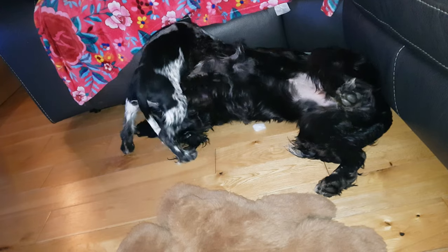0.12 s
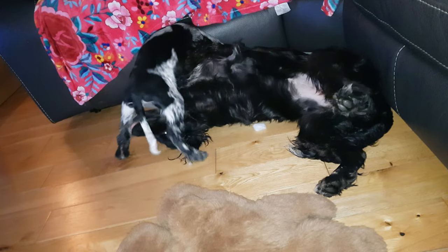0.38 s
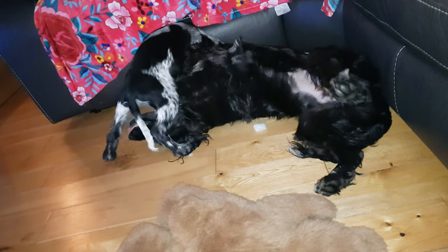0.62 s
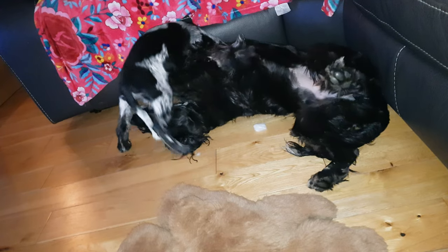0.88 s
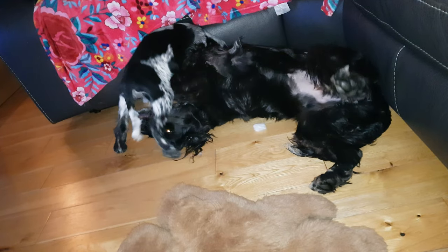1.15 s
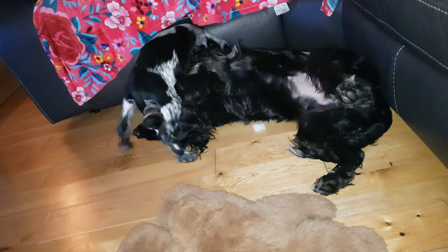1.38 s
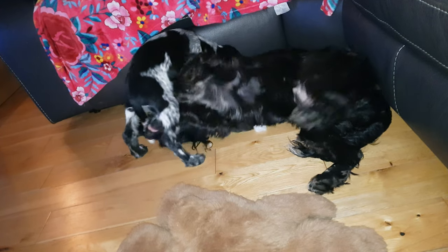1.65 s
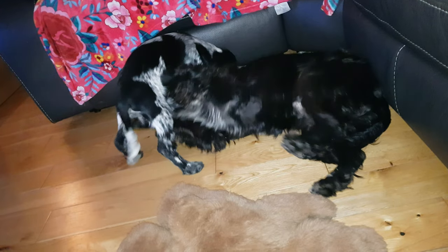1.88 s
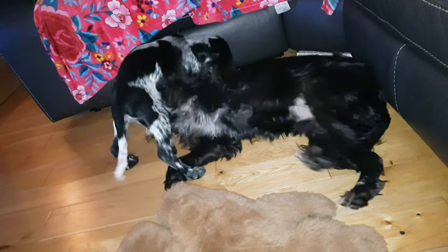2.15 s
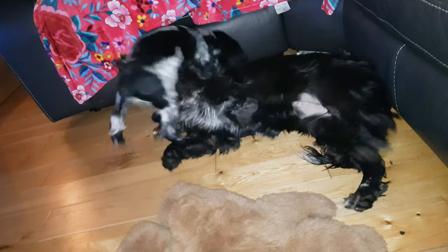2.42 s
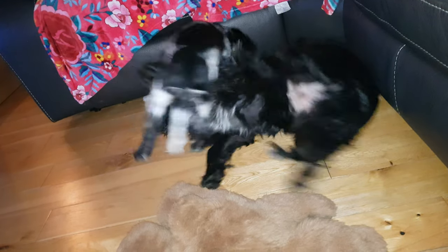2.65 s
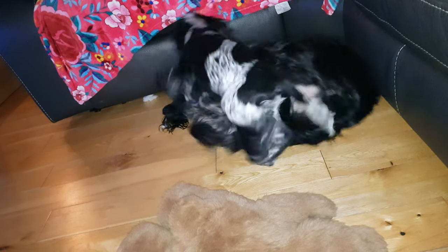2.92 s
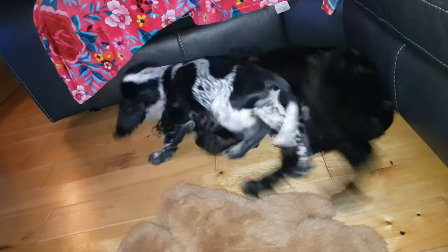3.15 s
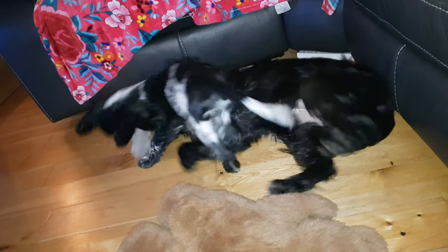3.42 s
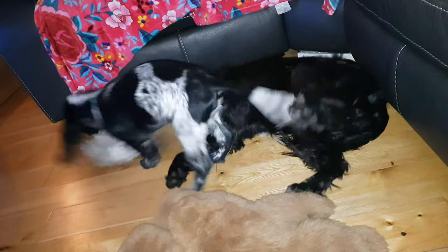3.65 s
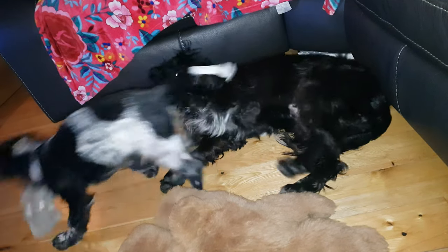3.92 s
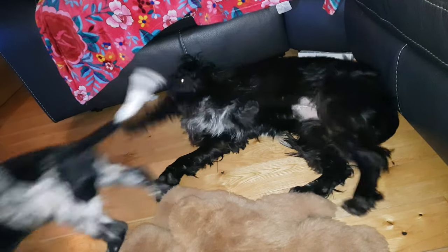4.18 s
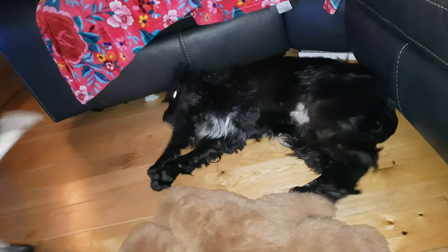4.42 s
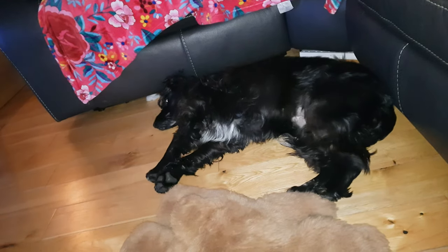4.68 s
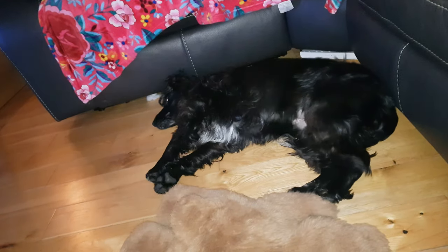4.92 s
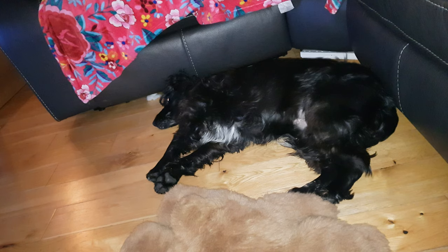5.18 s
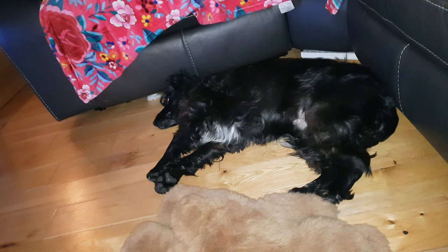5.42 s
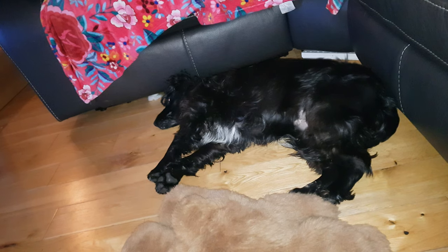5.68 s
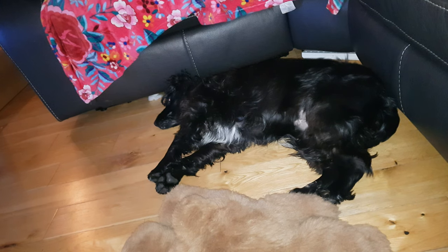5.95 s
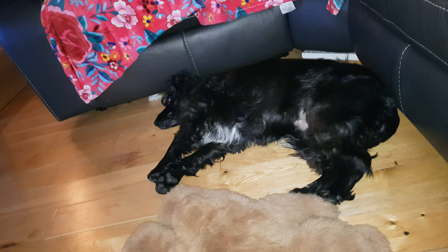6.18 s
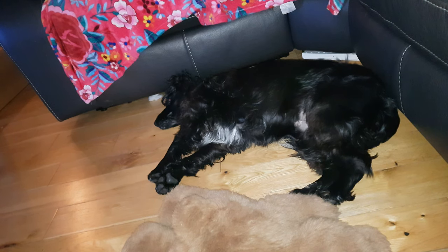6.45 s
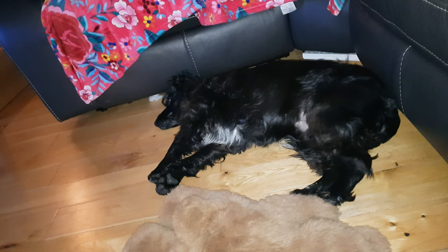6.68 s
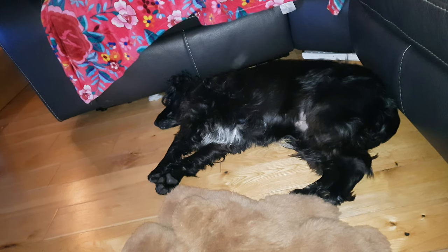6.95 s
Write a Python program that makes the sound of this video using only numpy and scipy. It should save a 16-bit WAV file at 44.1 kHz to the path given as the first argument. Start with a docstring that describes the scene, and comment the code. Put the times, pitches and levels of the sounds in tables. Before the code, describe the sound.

A quiet living room with a very faint wavering low motor hum and soft air noise, picked up closely in stereo with a short, damped echo. From 0 to 1.4 seconds there are breathy puffs and silky, high fur swishes mostly on the right, with a faint thud at 0.2 and a tiny claw skid near 0.6. Dull, hollow floor thumps come at 1.5 and 2.15, with brief board rattles. At 2.9 a blow brings clattering claws and rattling wood; more knocks follow, climaxing at 3.2 in a heavy, booming thud with a hard crack. From 3.4 to 4.4 lighter thumps, swishes, pants and skids trail off as a dog scampers away. Soft low bumps follow at 4.6 and 4.75, with a little crinkle. Between about 5.4 and 6.4, crisp crackling bursts with sharp snaps are strongest around 5.55 and 5.8, then near silence to 7.

```python
"""Dogs wrestling on a wooden floor

Two dogs wrestle on a sprung floor in a quiet living room. Blows set floor modes ringing, loose boards
rattle in bands of noise, and claws tick and skid. Panting and brushing fur are shaped noise; later
something crinkly is clawed nearby, made of many tiny rings. A motor hums below, as two wavering tones.
"""
import sys
import numpy as np
from scipy import signal
from scipy.fft import rfft, irfft, next_fast_len
from scipy.io import wavfile

SR = 44100
rng = np.random.default_rng(int(sys.argv[2]) if len(sys.argv) > 2 else 0)


def digitize_waveform(pressure):
    """Quantize a signal to 16-bit integers and store it at the path in sys.argv[1].

    Rows of a 2-D input are taken as channels; values are limited to [-1, 1].
    """
    field = np.atleast_2d(pressure).T
    bounded = np.clip(field, -1, 1)
    quanta = np.round(bounded * 32767).astype(np.int16)
    wavfile.write(sys.argv[1], SR, quanta)


def invert_db(level):
    """Linear amplitude ratio for a level in decibels (20 dB per decade), elementwise."""
    return 10 ** (np.asarray(level, dtype=float) / 20)


N = 311787   # length in samples

# how alike left and right are at each pitch: pitch_hz, likeness (0 unrelated, 1 the same)
LIKENESS = [(60, 0.95), (250, 0.64), (600, 0.3), (1200, 0), (5000, 0)]
EDGE_DB = 20   # a swell, fade or rattle length is the time to this far under the peak


def rms_one(x):
    """Scales a sound to an average (rms) level of 1."""
    return x / np.sqrt(np.mean(x ** 2) + 1e-20)


def bins_hz():
    """Lists the pitches of a spectrum of the whole scene, with 1 Hz in place of zero."""
    return np.maximum(np.fft.rfftfreq(N, 1 / SR), 1)


def at_hz(points, hz):
    """Reads a curve between its points, on a logarithmic pitch axis."""
    points = np.array(points)
    return np.interp(np.log(hz), np.log(points[:, 0]), points[:, 1])


def drift(rate_hz):
    """Makes a slow random wander of rms 1: smoothed noise, worked out every 40 samples."""
    r = np.exp(-80 * np.pi * rate_hz / SR)
    steps = rng.standard_normal(N // 40 + 2002)
    slow = signal.lfilter([1], [1, -2 * r, r * r], steps)[2000:]   # skip the settling in
    return np.interp(np.arange(N) / 40, np.arange(len(slow)), rms_one(slow))


def panned(x, lean_db):
    """Turns the left up by half the lean and the right down by half."""
    return x * invert_db(np.array([[0.5], [-0.5]]) * lean_db)


def colour(x, spectrum):
    """Filters a sound by a curve of pitch_hz, level_db and scales it to rms 1."""
    return rms_one(irfft(rfft(x) * invert_db(at_hz(spectrum, bins_hz())), N))


def wide_noise():
    """Makes stereo noise, alike on both sides in the bass and unrelated in the treble."""
    alike = np.clip(at_hz(LIKENESS, bins_hz()), 0, 1)
    mid, side = rfft(rng.standard_normal((2, N)))
    return irfft(np.sqrt(1 + alike) * mid + np.sqrt(1 - alike) * side * [[1], [-1]], N)


def ring(clicks, hz, t60_s):
    """Lets each unit click start a dying sine of height 1 (t60: time to fall by 60 dB)."""
    r = invert_db(-60 / (t60_s * SR))
    w = 2 * np.pi * hz / SR
    return signal.lfilter([0, np.sin(w)], [1, -2 * r * np.cos(w), r * r], clicks + 1e-18)


def strokes(rows, peaks, bend, climb_per_s=0):
    """Adds up swells and fades (bend 1 pointed, higher flatter), each times a peak that may climb."""
    peak_s, swell_s, fade_s = np.transpose(rows)[:3, :, None]
    late_s = np.arange(0, N + 40, 40) / SR - peak_s
    away = np.where(late_s < 0, -late_s / np.abs(swell_s), late_s / np.abs(fade_s))
    shape = invert_db(-np.minimum(EDGE_DB * away ** bend, 90)) ** 2
    climb = 1 + climb_per_s * np.clip(late_s, -swell_s, fade_s)
    total = peaks @ (shape * climb)
    return np.interp(np.arange(N) / 40, np.arange(len(total)), total)


def stroke_gain(rows, column, bend):
    """Gives the loudness curve of strokes whose peak levels in dB stand in one column."""
    power = invert_db(np.array(rows)[:, column]) ** 2
    return np.sqrt(strokes(rows, power, bend))


def stroke_pitch(rows, bend, climb_per_s):
    """Gives the loudness curve and a pitch in Hz that leans to the loudest stroke and climbs."""
    power, hz = invert_db(np.array(rows)[:, 3]) ** 2, np.array(rows)[:, 4]
    total = strokes(rows, power, bend)
    return np.sqrt(total), strokes(rows, power * hz, bend, climb_per_s) / total


def room_tone():
    """A motor hum of wavering sines, over a noise of rumble and hiss."""
    # hum tones: pitch_hz, level_db (before the waver)
    hum_tones = [(49.5, -59.5), (99, -70)]
    # colour of the air noise: pitch_hz, density_db (per Hz, before scaling)
    air_colour = [(33, -25.5), (46, -11.5), (66, -11), (152, -15), (222, -27.5), (283, -25.5), (391, -34),
                  (2030, -39), (3480, -42), (4100, -38), (4430, -32.5), (4850, -41), (7010, -36.5),
                  (8470, -43), (14500, -39.5), (15700, -41.5)]
    # left-right balance of the air noise: pitch_hz, lean_db (plus is left)
    air_lean = [(60, 5.5), (180, -2), (550, 2), (1650, -1), (4970, -5.5), (15000, 1)]
    air_db = -66
    turns = np.cumsum(1 + 0.002 * drift(0.66)) / SR   # one shared waver of pitch
    hum = 0
    for hz, db in hum_tones:
        level = np.sqrt(2) * invert_db(db + hz / 50 * drift(4.0))
        hum = hum + level * np.sin(2 * np.pi * hz * turns)
    air = colour(wide_noise(), air_colour)
    air = irfft(panned(rfft(air), at_hz(air_lean, bins_hz())), N)
    return hum + invert_db(air_db + 0.53 * drift(8.9)) * air


def living_room(x):
    """Echoes from eight feedback delays a side, duller on every round."""
    t60_s, wall_cut_hz = 0.3, 10400
    size = next_fast_len(N + SR)   # room for the tail
    w = 2 * np.pi * np.fft.rfftfreq(size)
    dull = np.exp(-2 * np.pi * wall_cut_hz / SR)
    wall = (1 - dull) / (1 - dull * np.exp(-1j * w))
    echoes = np.zeros((2, len(w)), complex)
    lags = (rng.uniform(0.01, 0.023, 16) * SR).astype(int)
    for k, lag in enumerate(lags):
        loop = invert_db(-60 * lag / SR / t60_s) * wall * np.exp(-1j * w * lag)
        echoes[k % 2] += loop / (1 - loop) * (-1) ** (k // 2)
    # long waves reach both microphones alike
    alike = np.clip(at_hz(LIKENESS, np.maximum(w * SR / (2 * np.pi), 1)), 0, 1)
    echoes[1] = alike * echoes[0] + np.sqrt(1 - alike ** 2) * echoes[1]
    wet = irfft(echoes * rfft(x, size), size)[:, :N]
    # the echo carries little of the deep bass
    return signal.lfilter(*signal.butter(2, 170, "high", fs=SR), wet)


def crinkling(per_s=3000, size_db=5.5, bend=0.78, cycles=9.1):
    """Dense uneven snaps in clumps, each a brief ring, over a rubbing hiss; some strokes add a dull part."""
    # strokes: peak_s, swell_s, fade_s, bright_db, dull_db (levels before panning)
    crinkle_strokes = [(4.76, 0.019, 0.13, -61.5, -82.5), (5.49, 0.03, 0.072, -60.5, -113),
                       (5.55, 0.051, 0.098, -52, -60.5), (5.62, 0.18, 0.44, -64.5, -86),
                       (5.81, 0.08, 0.073, -49, -55.5), (5.86, 0.039, 0.13, -50, -72),
                       (6.07, 0.025, 0.15, -55.5, -72), (6.2, 0.26, 0.27, -57, -73),
                       (6.39, 0.062, 0.075, -57, -78.5)]
    # colour of the bright part: pitch_hz, density_db (per Hz, before scaling)
    bright_colour = [(1470, -57), (2200, -36), (2980, -0.5), (3400, -5.5), (4060, 2.5), (6350, 3.5),
                     (8120, -4), (11300, -3), (15700, -11)]
    dull_colour = [(500, -17), (1000, -6.0), (2500, 3.0), (3500, -21.0), (6000, -39.0)]   # (Hz, dB)
    dull_lag_s = 0.02   # the dull part follows the bright part
    born = rng.random(N) < per_s * invert_db(5 * drift(40)) / SR   # the rate wanders, so snaps clump
    sizes = invert_db(size_db * np.minimum(rng.exponential(1, N), 3.5))
    clicks = born * sizes * rng.choice([-1, 1], N)
    dealt = rng.integers(0, 8, N)   # each snap gets one of eight pitches
    snaps = np.zeros(N)
    for k, hz in enumerate(np.geomspace(1500, 13000, num=8)):
        snaps += ring(clicks * (dealt == k), hz, cycles / hz) * np.sqrt(hz)
    source = rms_one(snaps) + 1.84 * wide_noise()
    dull = colour(source, dull_colour)
    dull_gain = np.roll(stroke_gain(crinkle_strokes, 4, bend), int(dull_lag_s * SR))
    bright = stroke_gain(crinkle_strokes, 3, bend) * colour(source, bright_colour)
    return panned(bright + dull_gain * dull, -2.2)


def brushing(flutter_db=1.5, left_db=-22, right_db=5.0, octaves=0.15, bend=1.69):
    """Smooth bright friction noise close on the right; its brightest band climbs through each stroke."""
    # strokes: peak_s, swell_s, fade_s, strength_db (before mixing and panning), brightest_hz (at the peak)
    brush_strokes = [(0.8, .12, 0.14, -60.5, 12400), (0.97, 0.12, 0.098, -59, 12540),
                     (1.19, 0.12, 0.29, -62.5, 10700), (1.37, 0.069, 0.15, -63.5, 10700),
                     (1.62, 0.25, 0.27, -66, 12100), (2.62, 0.064, 0.13, -60, 13500),
                     (2.92, 0.036, 0.18, -55.5, 11900), (3.13, 0.36, 0.23, -62, 10000),
                     (3.62, 0.092, 0.84, -70.5, 13800), (3.89, 0.19, 0.074, -55, 12800),
                     (3.985, 0.014, 0.031, -60, 12100), (4.174, 0.11, 0.12, -59.5, 13000)]
    # colour of the hiss: pitch_hz, density_db (per Hz, before scaling)
    hiss_colour = [(3530, -33.5), (6000, -12.5), (6910, -2.5), (8700, -7.5), (11000, -0.5), (14400, -3.5),
                   (15700, -0.5)]
    gain, centre_hz = stroke_pitch(brush_strokes, bend, climb_per_s=0.37)
    hiss = colour(rng.standard_normal((2, N)), hiss_colour)
    out = 0.44 * hiss
    # fade between six fixed bands so that the bright spot can move
    for hz in np.geomspace(9500, 15000, num=6):
        band = signal.butter(1, [hz / 1.07, hz * 1.07], "band", fs=SR, output="sos")
        nearness = np.exp(-(np.log2(centre_hz / hz) / octaves) ** 2)
        out = out + nearness * signal.sosfilt(band, hiss)
    return out * invert_db(np.array([[left_db], [right_db]])) * gain * invert_db(flutter_db * drift(12))


def panting(flutter_db=1.57, bend=1.16):
    """Turbulent air through the open mouth and past the teeth; fur on wood sounds much alike."""
    # breaths and fur strokes: peak_s, swell_s, fade_s, mouth_db, teeth_db (before flutter and panning)
    breaths = [(0.4, 0.089, 0.44, -58.5, -61.5), (0.72, 0.56, 0.38, -80.5, -66),
               (1.2, 0.068, 0.17, -75.5, -68.5), (1.9, 0.86, 0.77, -73.5, -71),
               (2.55, 0.2, 0.67, -79, -72.5), (2.884, 0.016, 0.14, -67, -63.5), (3.07, 0.18, 1, -68, -66),
               (3.23, 0.095, 0.19, -58, -61), (3.41, 0.006, 0.15, -74, -64), (3.5, 0.15, 0.061, -67, -66),
               (3.78, 0.14, 0.2, -69, -63.5), (3.97, 0.29, 0.16, -71, -67.5),
               (4.215, 0.083, 0.055, -65.5, -68), (4.305, 0.03, 0.26, -63.5, -70),
               (4.8, 1, 0.071, -78.5, -71.5), (4.87, 0.11, 0.06, -71, -70.5),
               (5.057, 0.02, 0.092, -66.5, -68), (5.33, 0.16, 0.23, -80.5, -69)]
    # colour of open-mouth air: pitch_hz, density_db (per Hz, before scaling)
    mouth_colour = [(410, -16), (700, -12), (860, -8.5), (1130, -1.5), (1490, -10), (1840, -2.5),
                    (3600, -8.5), (4680, -4), (7920, -120)]
    # colour of air past the teeth: pitch_hz, density_db (per Hz, before scaling)
    teeth_colour = [(2120, -32), (3600, -6.5), (5180, 3), (7230, -0.5), (8980, -9.5), (11400, -9),
                    (15100, -17), (15700, -62)]
    mouth = colour(wide_noise(), mouth_colour) * stroke_gain(breaths, 3, bend)
    mouth = mouth * invert_db(flutter_db * drift(24))
    teeth = colour(wide_noise(), teeth_colour) * stroke_gain(breaths, 4, bend)
    teeth = teeth * invert_db(flutter_db * drift(22))
    return panned(mouth + teeth, -3.0)


def skidding(width_hz=300, bend=1.4):
    """Skidding claws: slow noise times a sine makes a narrow band of noise around the sine's pitch."""
    # skids: peak_s, swell_s, fade_s, level_db (before panning), pitch_hz (at the peak)
    skids = [(0.635, 0.03, 0.053, -61.5, 4500), (0.78, 0.25, 0.24, -73, 997.5),
             (1.43, 0.01937, 0.07, -76.5, 1790), (3.785, 0.066, 0.14, -64.5, 1866),
             (3.946, 0.1, 0.088, -66.5, 2048), (4.315, 0.025, 0.052, -64, 2600),
             (4.87, 0.067, 0.1, -74.5, 2076)]
    gain, centre_hz = stroke_pitch(skids, bend, climb_per_s=0.061)
    lowpass = signal.butter(2, width_hz, fs=SR)
    slow = rms_one(signal.lfilter(*lowpass, rng.standard_normal((2, N))))
    tone = np.sqrt(2) * np.sin(2 * np.pi * np.cumsum(centre_hz) / SR)
    return panned(gain * slow * tone, -4.5)


def ticks(cycles=16.0, grit_t60_s=0.009):
    """Claw ticks and crinkle snaps: each is a short gritty ring, filtered around its own pitch."""
    # ticks: start_s, level_db (before filtering and panning), pitch_hz
    tick_rows = [(2.875, -43.5, 4430), (2.8751, -36, 1880), (3.2215, -31, 2100), (4.301, -48, 4870),
                 (4.4028, -47, 4400), (5.555, -40, 7400), (5.777, -43, 6680), (5.814, -35, 6400),
                 (5.8248, -31.5, 5460), (5.854, -41, 3000), (6.0672, -36, 6700), (6.13, -47, 4350),
                 (6.162, -37, 10430), (6.241, -48, 5000), (6.264, -36, 6050), (6.2815, -33.5, 6800),
                 (6.331, -45.5, 6780), (6.3596, -43, 6800), (6.369, -38.5, 11630)]
    out, t = np.zeros(N), np.arange(800) / SR
    grit = rng.standard_normal((len(tick_rows), len(t)))
    for (s, db, hz), noise in zip(tick_rows, grit):
        band = signal.butter(2, [hz * 0.72, min(hz * 1.24, 14000)], "band", fs=SR, output="sos")
        tone = np.sin(2 * np.pi * hz * t) * invert_db(-60 * t * hz / cycles)   # falls 60 dB in so many cycles
        tick = tone + 0.5 * noise * invert_db(-60 * t / grit_t60_s)
        at = round(s * SR)
        out[at:at + len(t)] += invert_db(db) * signal.sosfilt(band, tick)
    return panned(out, -2.5)


def rattles(bend=1.8, rise_s=0.002):
    """A loose board rattles on after some blows: a band of noise that holds a moment and then stops."""
    # rattles: start_s, length_s, level_db (before the rise and fall), pitch_hz (middle), width_hz
    rattle_rows = [(1.511, 0.095, -74, 1050, 900), (1.575, 0.036, -60.5, 533, 560),
                   (2.178, 0.059, -55.5, 653, 636), (2.874, 0.078, -50, 600, 160),
                   (2.881, 0.081, -57, 1560, 400.7), (4.2, 0.073, -57, 870, 790),
                   (4.289, 0.067, -57.5, 870, 910)]
    out, t = np.zeros((2, N)), np.arange(SR // 4) / SR
    noise = rng.standard_normal((len(rattle_rows), 3, len(t)))
    for (s, length_s, db, hz, width_hz), (mid, *own) in zip(rattle_rows, noise):
        band = signal.butter(2, [hz - width_hz / 2, hz + width_hz / 2], "band", fs=SR, output="sos")
        shape = (1 - np.exp(-t / rise_s)) * invert_db(db - EDGE_DB * (t / length_s) ** bend)
        both_sides = mid + 0.68 * np.array(own)   # a shared noise plus one of each side's own
        at = round(s * SR)
        out[:, at:at + len(t)] += shape * rms_one(signal.sosfilt(np.vstack([band, band]), both_sides))
    return out


def thumps(spread_db=3.5, hardness=1.78, flesh_hardness=1.33, swell_hz=200):
    """Weight sways joists and booms boards; flesh slaps, bone knocks and claws clack in higher modes."""
    # blows, as drives to the modes: start_s, boom_db (flesh), sway_db (weight), knock_db (bone), clack_db (claw)
    blows = [(0.21, -49, -53, -83, -97), (1.506, -37, -37.5, -53.5, -86), (1.545, -39, -59, -61.5, -85),
             (2.144, -40, -57, -63, -56.5), (2.178, -47.5, -46.5, -60, -79), (2.429, -48, -42, -73, -75),
             (2.76, -54.5, -51, -68.5, -58.5), (2.875, -36, -34.5, -51, -41),
             (2.911, -43.5, -37, -57.5, -62), (3.045, -40.5, -33.5, -40.5, -43.5),
             (3.091, -40.5, -41, -54, -50), (3.209, -33, -24, -42, -52), (3.222, -16.5, -55, -31, -36),
             (3.27, -26, -48, -54, -44.5), (3.363, -38.5, -59, -67, -81), (3.475, -40, -37, -53.5, -51),
             (3.701, -40.5, -39.5, -66, -64), (3.796, -54, -49, -74, -57.5), (3.919, -43, -44, -77, -64),
             (4.036, -39, -39.5, -76, -70), (4.098, -51, -43, -71.5, -70), (4.175, -39.5, -45, -86, -79),
             (4.198, -39.5, -41.5, -58.5, -56), (4.286, -41.5, -55, -54.5, -58),
             (4.58, -53, -49.5, -72.5, -68), (4.755, -51.5, -48.5, -68.5, -90.5)]
    # ways the joists ring: pitch_hz, level_db (added to the drive), t60_s
    joists = [(60.24, -3, 0.47), (80.7, 7, 0.077)]
    # ways the boards ring: pitch_hz, level_db (added to the drive), t60_s
    boards = [(96.3, -3.5, 0.27), (135, 0.5, 0.28), (160, 2, 0.069), (188, 12, 0.037), (245.1, 6, 0.12),
              (299, -4.5, 0.06), (370, -7, 0.05), (482, -3, 0.14), (602, 1, 0.046), (764, -8, 0.027),
              (1050, -16, 0.04), (1446, -8, 0.05), (1663, -16.5, 0.05), (2200, -3, 0.01392)]
    # the spot struck shifts; how far the deepest board mode outweighs the other booms: time_s, extra_db
    spot = [(1.5, 1), (3.05, 8), (3.22, 9), (3.5, 4), (3.7, 6), (4.2, 9), (4.8, 10.5)]
    # chatter bands for slap, knock and clack: low_hz, high_hz, level_db (added to the drive), t60_s
    chatter = [(173, 368, -14.5, 0.23), (435, 843, -6.5, 0.16), (1120, 1900, -13.5, 0.35)]
    centred_hz = 711   # bands that start under this chatter mostly alike on both sides
    s, boom_db, sway_db, knock_db, clack_db = np.transpose(blows)
    slap_db = 0.74 * boom_db + 0.55 * knock_db + 10.5   # the slap grows with boom and knock
    parts_db = [boom_db, sway_db, slap_db, knock_db, clack_db]
    deep_db = np.interp(s, *np.transpose(spot))
    at, out = np.round(s * SR).astype(int), np.zeros((2, N))
    modes = [*joists, *boards]
    luck = rng.standard_normal((len(at), len(modes)))
    for k, (hz, db, t60_s) in enumerate(modes):
        # from low to high pitch: sway, boom, slap, knock, clack
        part = [1, 0, 2, 3, 4][np.searchsorted([85, 172, 400, 1100], hz)]
        drive_db = parts_db[part] + db + spread_db * luck[:, k]
        if part == 0:
            drive_db = drive_db + deep_db * (0.5 if k == len(joists) else -0.5)
        clicks = np.zeros(N)
        clicks[at] = invert_db(drive_db)
        # pads and fur soften the contact: it lasts a share of the mode's cycle
        # a body lands more slowly than a paw knocks, so the deep modes start later
        order, firmness = (3, flesh_hardness) if part < 3 else (2, hardness)
        soft = signal.butter(order, firmness * hz, fs=SR, output="sos")
        clicks = signal.sosfilt(soft, clicks + 1e-18)
        # a mode radiates little below its own pitch
        out += signal.lfilter(*signal.butter(1, hz / 2, "high", fs=SR), ring(clicks, hz, t60_s))
    # loose boards chatter after the blow
    for part_db, (low_hz, high_hz, db, t60_s) in zip(parts_db[2:], chatter):
        clicks = np.zeros(N)
        clicks[at] = invert_db(part_db + db)
        dying = signal.lfilter([1], [1, -invert_db(-60 / (t60_s * SR))], clicks + 1e-18)
        dying = signal.lfilter(*signal.butter(1, swell_hz, fs=SR), dying)   # rounds the start
        band = signal.butter(2, [low_hz, high_hz], "band", fs=SR, output="sos")
        noise = wide_noise() + centred_hz / low_hz * rng.standard_normal(N)
        out += dying * rms_one(signal.sosfilt(band, noise))
    return out


def scene():
    """Blows get the room's echo; the soft noises lie over them."""
    blows = thumps() + rattles() + ticks()
    echo = invert_db(-13.5) * living_room(blows.mean(axis=0))
    soft_noises = panting() + skidding() + brushing() + crinkling()
    return blows + echo + soft_noises + room_tone()


def band_limit(x):
    """A steep low-pass at the top of the band."""
    return signal.sosfilt(signal.butter(12, 15890, fs=SR, output="sos"), x)


def record(dry):
    """The microphones drop the deepest bass, below about 38 Hz."""
    bass_cut = signal.butter(4, 38, "high", fs=SR, output="sos")
    mix = signal.sosfilt(bass_cut, dry)
    return band_limit(mix)


dry = scene()
out = record(dry)
digitize_waveform(out)
```